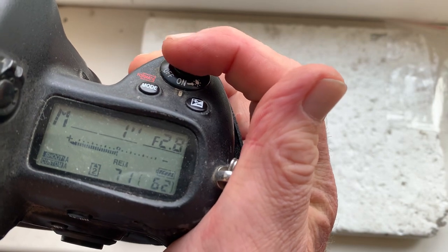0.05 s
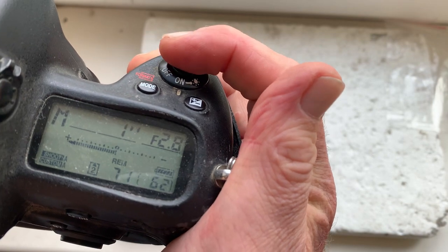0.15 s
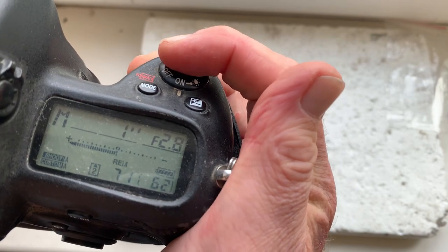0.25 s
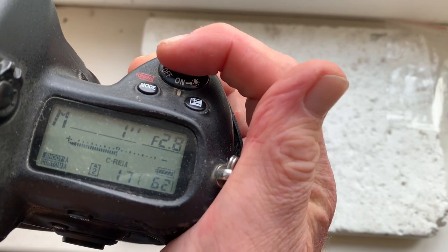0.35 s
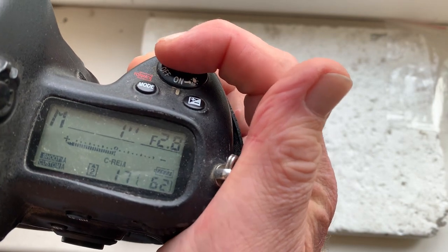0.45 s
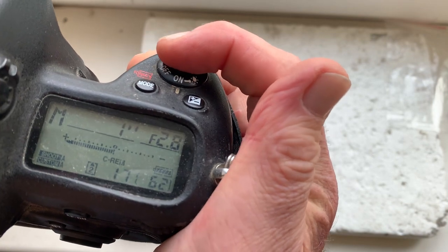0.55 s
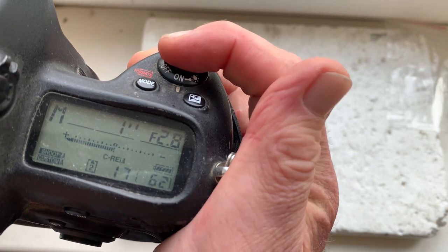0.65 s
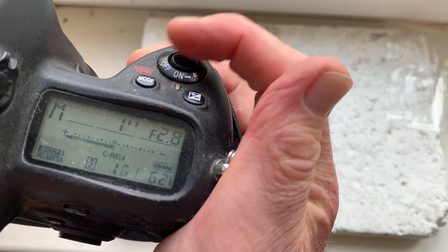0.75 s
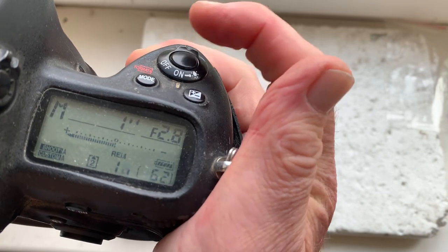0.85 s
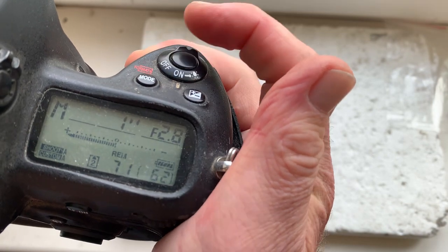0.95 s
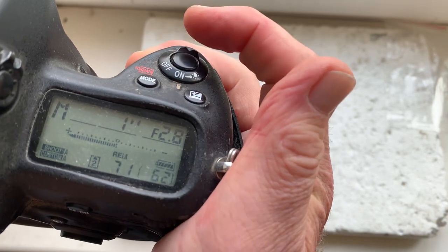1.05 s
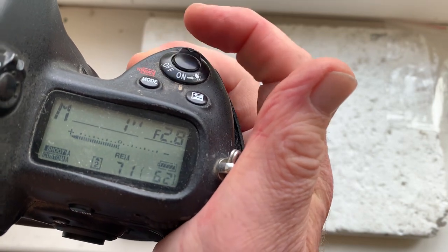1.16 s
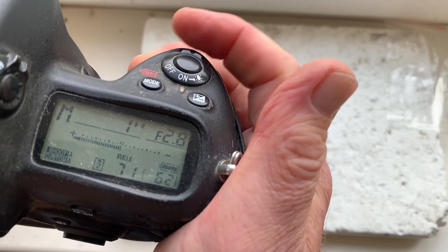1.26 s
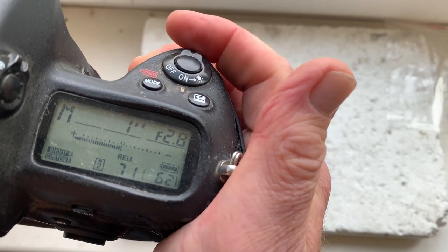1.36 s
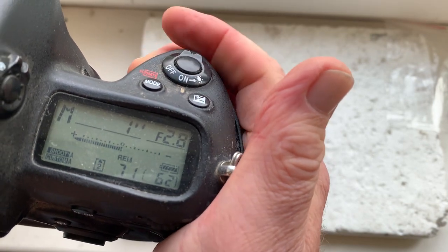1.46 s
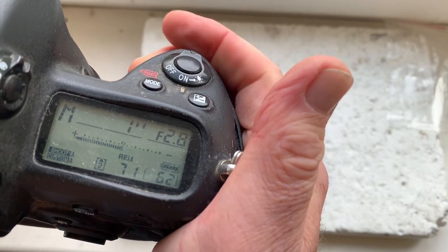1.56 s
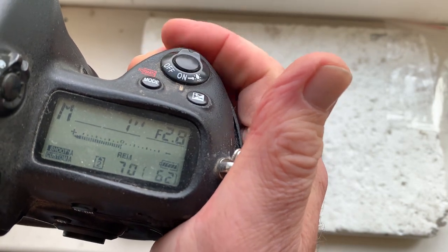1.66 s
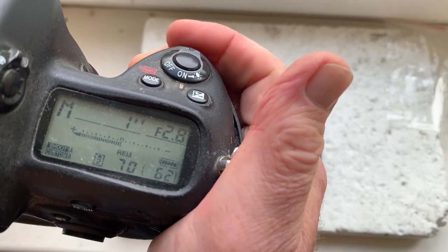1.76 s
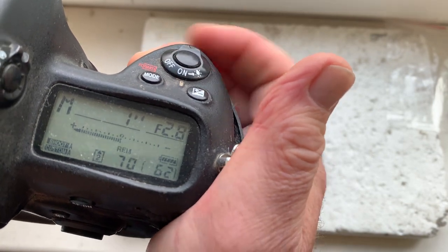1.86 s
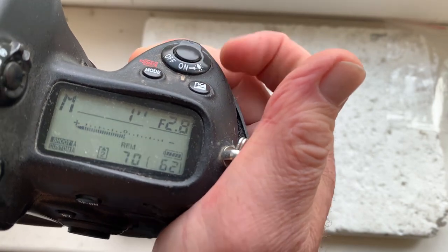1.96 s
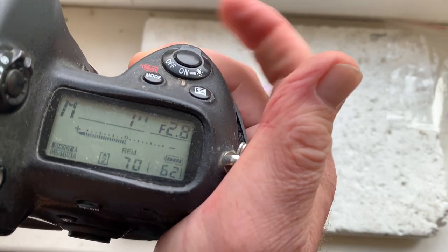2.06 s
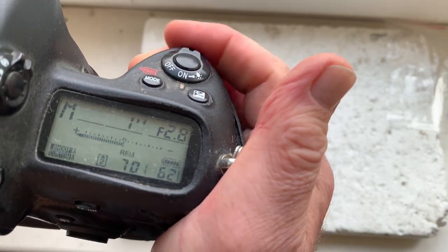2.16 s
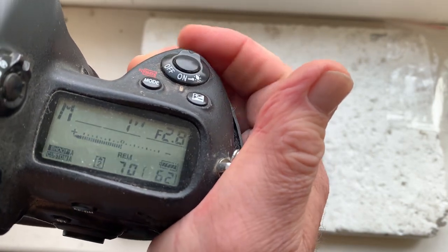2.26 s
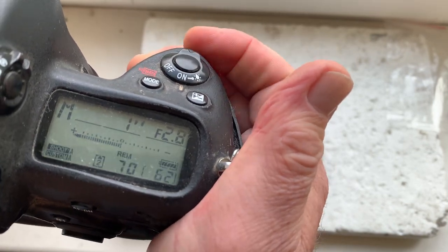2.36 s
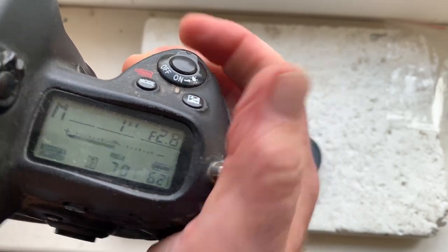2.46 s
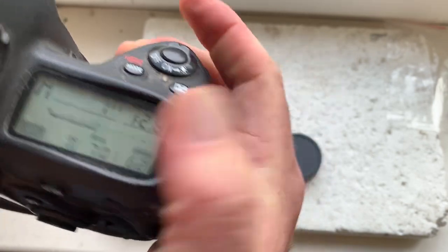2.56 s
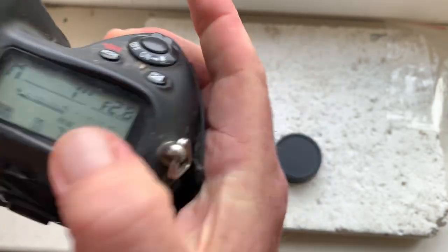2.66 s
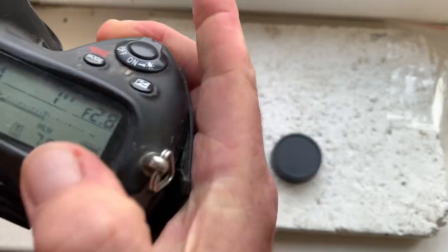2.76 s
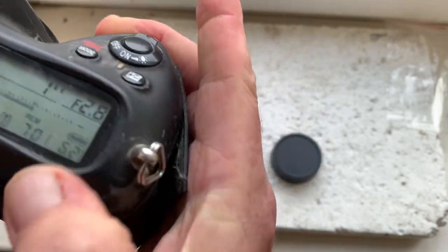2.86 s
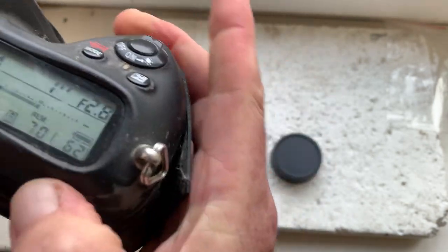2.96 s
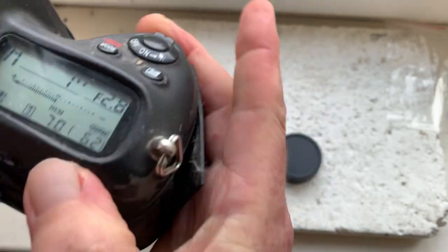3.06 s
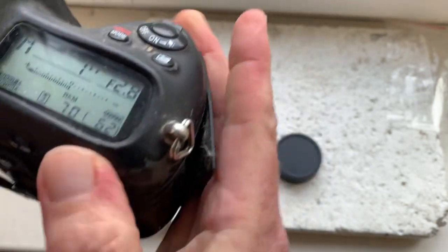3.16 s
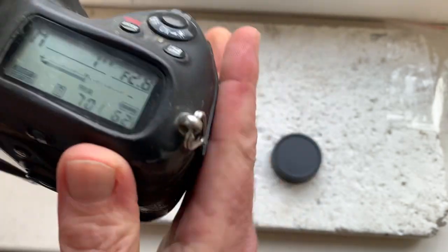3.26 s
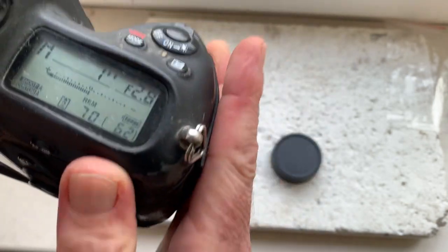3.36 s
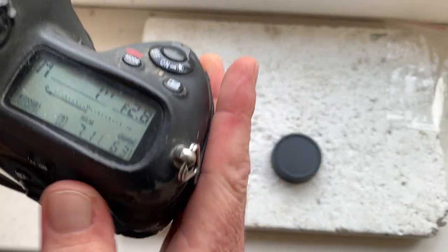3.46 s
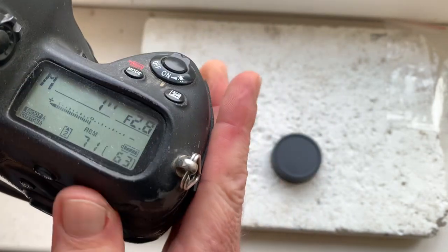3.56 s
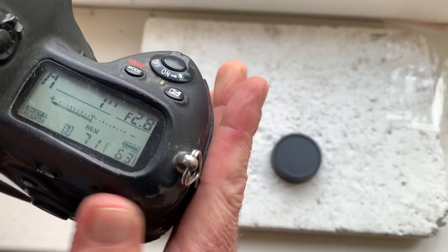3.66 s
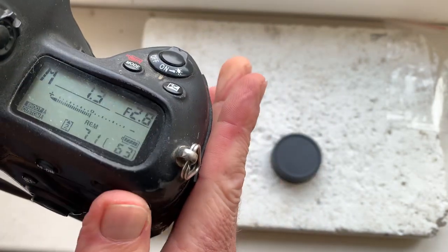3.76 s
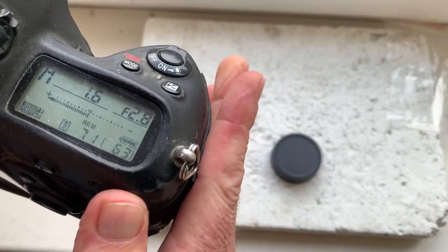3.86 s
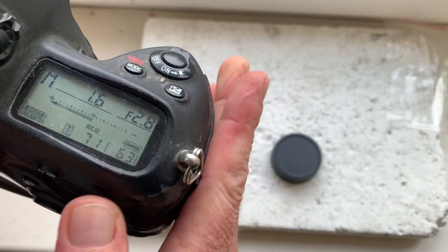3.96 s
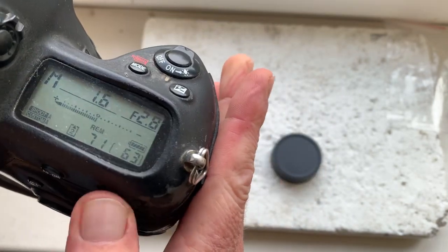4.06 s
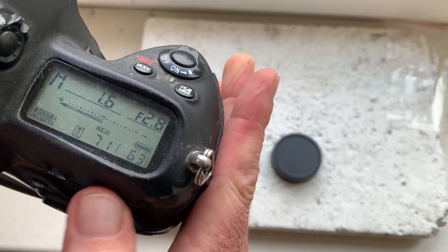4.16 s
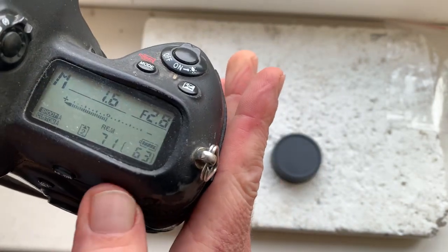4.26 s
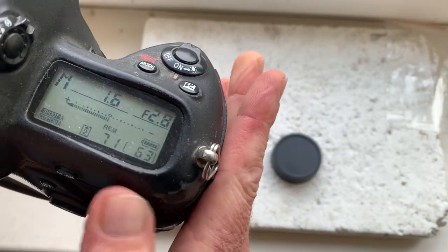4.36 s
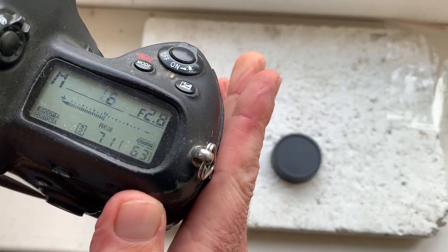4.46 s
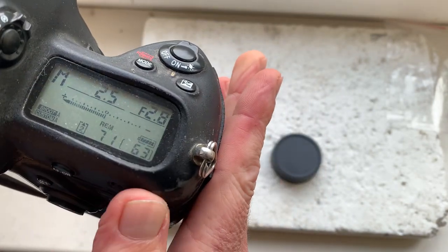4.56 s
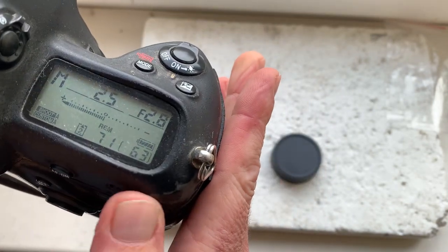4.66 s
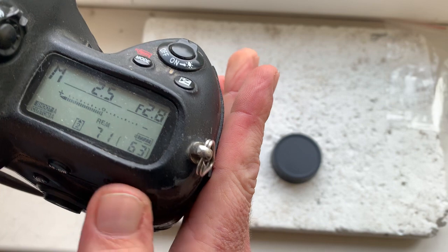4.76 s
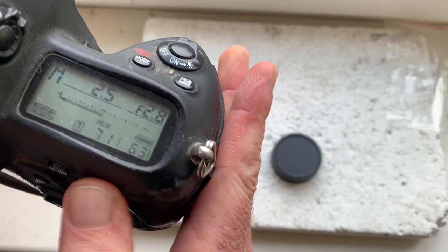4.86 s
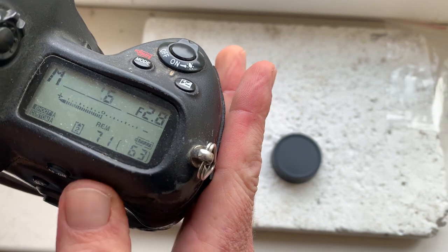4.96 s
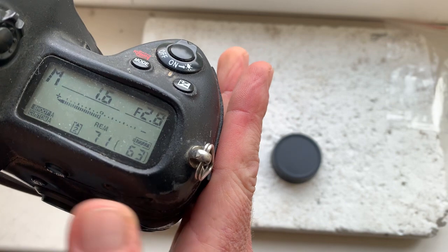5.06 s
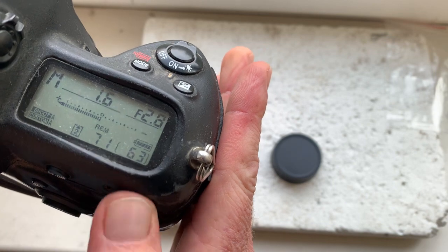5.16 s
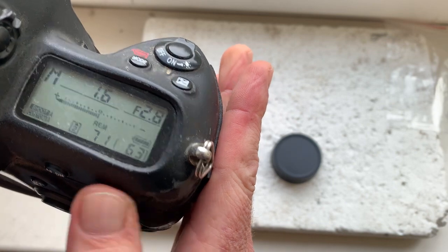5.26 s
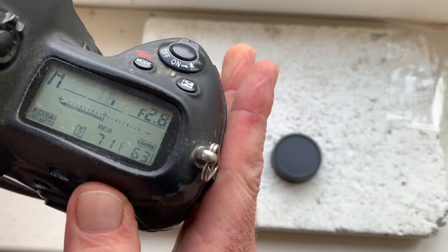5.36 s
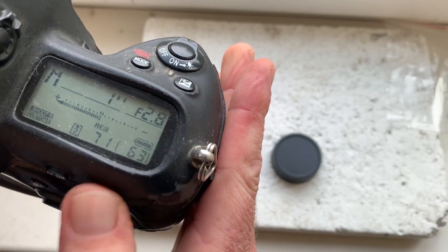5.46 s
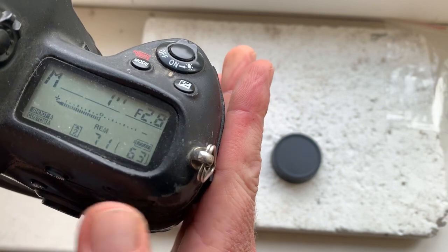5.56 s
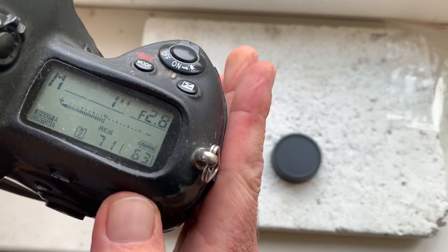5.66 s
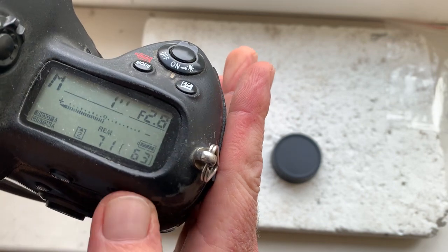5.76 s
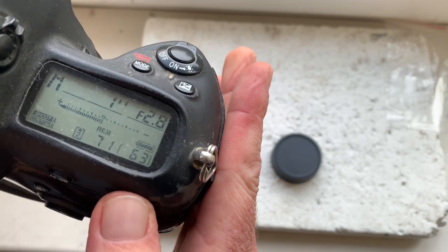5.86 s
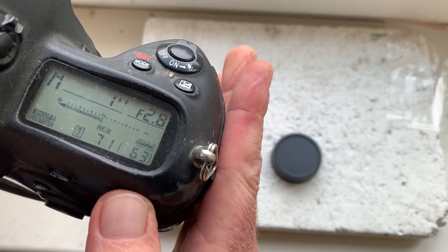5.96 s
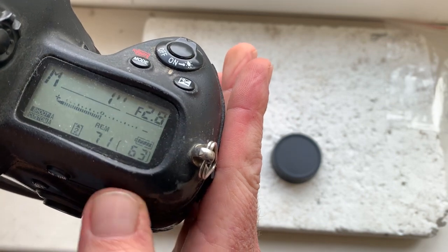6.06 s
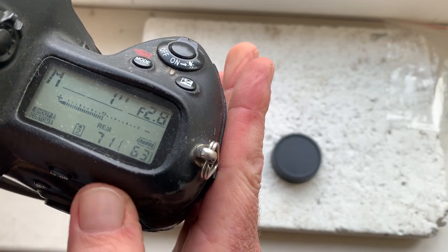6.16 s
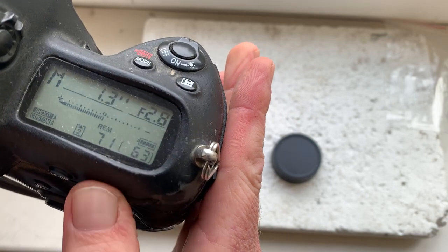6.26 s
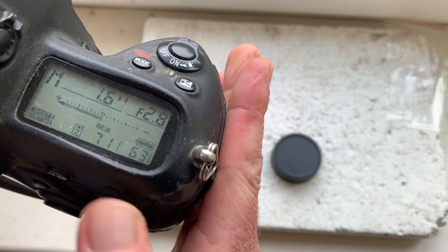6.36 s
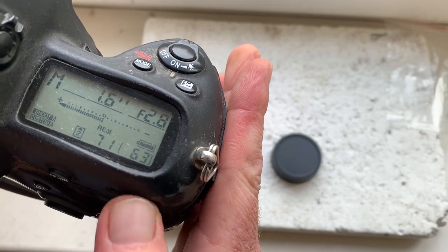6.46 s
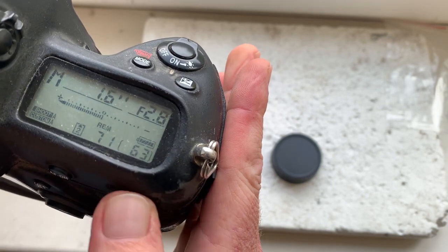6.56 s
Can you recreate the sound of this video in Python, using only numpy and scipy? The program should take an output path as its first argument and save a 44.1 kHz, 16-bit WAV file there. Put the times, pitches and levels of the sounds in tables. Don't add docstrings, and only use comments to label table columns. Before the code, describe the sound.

A quiet room holds a low, softly pulsing engine throb from beyond the walls, motor hum and faint hiss, heard by a close phone microphone. Barely audible skin ticks precede a loud, crisp metallic clatter at 0.43 s, a burst of hits lasting about 50 ms with a short shell ring. The rumble dips. A small tick sounds at 0.78, then at 1.47 a closing clatter, slightly longer and more rattling, with a brief thud and room echo; the rumble dips again. Light bright ticks come at 1.8-1.9 as skin lifts. At 2.43-2.75 fingers tap and slide on the grip, strongest near 2.55, with another rub and tick around 3.2 and a faint rubber creak. From 3.65 a thumb wheel clicks softly, with little buzzing slips near 3.9, 4.4, 4.7, 4.85, 5.27, 5.5, 6.1 and 6.55, all far quieter than the shutter.

```python
import sys
import numpy as np
from scipy import signal
from scipy.fft import rfft, irfft, next_fast_len
from scipy.io import wavfile
from scipy.ndimage import uniform_filter1d, map_coordinates

SR = 44100
rng = np.random.default_rng(int(sys.argv[2]) if len(sys.argv) > 2 else 0)


def voltage_ratio(level):
    return 10 ** (np.asarray(level, float) / 20)


def transcribe(signal):
    frames = np.atleast_2d(signal).T
    limited = np.clip(frames, -1, 1)
    pcm = np.round(limited * 32767).astype(np.int16)
    wavfile.write(sys.argv[1], SR, pcm)


N = 290971

METAL = {"body": [(940, 890, -10.5), (1490, 890, 3), (1900, 790, -3.5), (2360, 790, -4)],
         "middle": [(3500, 1400, -2.5), (4930, 4900, 0.5)], "treble": [(7790, 1200, -5), (9420, 1200, -0.5),
         (10800, 2000, 1), (12400, 1800, -1), (14600, 1500, 2), (15300, 1000, -4)]}
LEAN = {"metal": (1.0, 3, 0.9, -3, 3), "grip": (1.32, 3.5, 2, -5.5, 14.5), "detent": (1, -6, 0.84, 3, 5)}
STROKE_DB = 36


def unit(x):
    return x / np.sqrt(np.mean(x ** 2) + 1e-20)


def along(points, hz):
    f, v = np.transpose(points)
    return np.interp(np.log(hz + 1), np.log(f + 1), v)


def curves(rows):
    s, *cols = np.transpose(rows)
    return [np.interp(np.arange(N) / SR, s, c) for c in cols]


def wobble(rate):
    knots = rng.standard_normal(int(N * rate / SR) + 4)
    return map_coordinates(knots, [np.arange(N) * rate / SR])


def filtered(x, response):
    m = next_fast_len(N + SR // 2)
    return irfft(rfft(x, m) * response(np.fft.rfftfreq(m, 1 / SR)), m)[..., :N]


def pair(size, alike):
    a = rng.standard_normal((3, size))
    share = np.clip(alike, 0, 1)
    return np.sqrt(share) * a[0] + np.sqrt(1 - share) * a[1:]


def resonate(drive, part):
    out = 0
    for x, modes in zip(drive, (part["treble"], part["middle"], part["body"])):
        def response(f):
            bank = sum(voltage_ratio(db) * (1j * f * w / (c * c - f * f + 1j * f * w)) ** 2 for c, w, db in modes)
            return bank / np.sqrt(np.mean(abs(bank) ** 2))
        out = out + filtered(x, response)
    return out


def leaning(dull_db, lean, low=0):
    middle_slope, middle_db, body_slope, body_db, low_db = lean
    middle = middle_slope * dull_db + middle_db - low * low_db * .6
    body = body_slope * dull_db + body_db + low * low_db
    return voltage_ratio(np.array([0, middle, body]))


def contacts(table, part, lean, ring_db, alike, crack):
    drive, ring, t = np.zeros((3, 2, N + SR)), np.zeros(N + SR), np.arange(SR // 10) / SR
    for s, db, dull_db, t60_ms, hz in table:
        shape = voltage_ratio(-6e4 * t / max(t60_ms, 2)) * (1 - np.exp(-t / 0.000073))
        burst = shape * pair(len(t), alike)
        burst[:, 0] = crack * np.linalg.norm(shape)
        burst *= voltage_ratio(db) * np.linalg.norm(shape) / np.linalg.norm(burst, axis=1, keepdims=True)
        band = int(hz < 6500) + int(hz < 2780)
        gains = leaning(dull_db, lean, band == 2)
        k = round(s * SR)
        drive[:, :, k:k + len(t)] += gains[:, None, None] * burst
        ring[k:k + len(t)] += gains[band] * voltage_ratio(db + ring_db) * shape * np.sin(2 * np.pi * hz * t)
    return resonate(drive[..., :N], part) + ring[:N]


def rubs(strokes, part, lean, grain_db):
    drive, t = np.zeros((3, N)), np.arange(N) / SR
    for s, rise, fall, db, dull_db in strokes:
        away = np.where(t < s, (s - t) / rise, (t - s) / fall)
        drive += leaning(dull_db, lean)[:, None] * voltage_ratio(db - STROKE_DB * away)
    grain = unit(voltage_ratio(grain_db * (wobble(500) + 0.38 * wobble(90))))
    return resonate(drive[:, None] * grain * pair(N, 0.35), part)


def ducking():
    # (t/s, hold/s, first depth/dB, last depth/dB)
    loud_moments = [
        (0.459, 0.363, 3.7, 11.2),
        (1.49, 0.548, 16, 8.1),
    ]
    duck_s, return_s = 0.063, 0.05
    total_db = 0
    for s, hold, first_db, last_db in loud_moments:
        steps = [(s, 0), (s + duck_s, -first_db), (s + hold, -last_db), (s + hold + return_s, 0)]
        total_db = total_db + curves(steps)[0]
    return total_db


def background():
    # (t/s, level/dB)
    effort = [(0, -64.5), (.9, -66), (1.48, -61), (2.1, -65.5), (2.6, -61), (3.4, -66), (4.0, -59.5),
              (4.6, -64), (6.6, -64)]
    # (multiple of the cycle rate, level/dB)
    engine_orders = [(6, -12.5), (7, -22), (8, -6), (12, -19.5), (13, -20), (14, 0.5), (15, -14.5),
                     (16, -12.5), (18, -20), (19, -19), (21, -16.5), (24, -21), (27, -19), (28, -21),
                     (29, -19), (32, -17)]
    # (f/Hz, level/dB)
    hums = [(49.1, -17.5), (119.9, -15.5)]
    # (f/Hz, level per Hz/dB)
    rumble_colour = [(25, -30), (40, 0.5), (80, 6), (170, -5), (300, -21), (385, -9), (480, -18),
                     (700, -29), (1200, -55.5)]
    hiss_colour = [(150, -19.5), (280, 10), (600, 4), (1000, 3), (1800, 3), (3000, -3), (5000, -3),
                   (7500, -5.5), (10300, -4.5), (11200, 0.5), (11700, -7.5), (13000, -3.5), (13900, -15.5),
                   (14900, 2), (15600, -25)]
    cycle_hz = 5.348
    t = np.arange(N) / SR
    turn = 2 * np.pi * cycle_hz * (t - .044)
    engine = sum(voltage_ratio(db + wobble(11)) * np.cos(k * turn + 0.11 * wobble(0.86)) for k, db in engine_orders)
    motors = sum(voltage_ratio(db) * np.sin(2 * np.pi * hz * t) for hz, db in hums)
    rumble = unit(filtered(pair(N, 0.78), lambda hz: voltage_ratio(along(rumble_colour, hz))))
    hiss = unit(filtered(pair(N, .1), lambda hz: voltage_ratio(along(hiss_colour, hz))))
    room = voltage_ratio(curves(effort)[0] + ducking()) * (engine + motors + voltage_ratio(-4.0) * rumble)
    drift_db = .4 * wobble(6)
    return room + voltage_ratio(-80 + drift_db) * hiss


def hands():
    # (t/s, treble peak level/dB, dullness/dB, t60/ms, ring f/Hz)
    button_ticks = [(0.2374, -66, -3, 12, 2900), (0.334, -84.5, 10.5, 15, 2900), (0.7696, -67, 5, 20, 4220),
                    (0.7768, -39, -6.5, 5.2, 9100), (1.818, -42.5, -7.5, 4, 10800),
                    (1.8075, -65, -10, 15, 11000), (1.8254, -64, -11, 8, 11000),
                    (1.8338, -52, -4, 11, 9420), (1.8647, -54, -7, 6, 10500), (1.8705, -57, 2, 23, 11500),
                    (1.8755, -57, 4, 8.2, 10300), (1.8813, -55, 0, 17, 11540),
                    (1.8848, -50.5, -1.5, 21, 10200), (2.1146, -68.5, 3.5, 10.5, 4320),
                    (2.2608, -73, -7, 14, 10500), (2.2705, -65.5, -13.5, 14, 11000),
                    (2.279, -73, -16, 12, 10500), (.152, -77, -8, 12.5, 10800),
                    (2.2893, -79.5, 5.5, 15, 2700)]
    finger_ticks = [(2.4329, -35, -8.5, 7.4, 8600), (2.438, -50.5, 1.5, 18, 5000),
                    (2.4705, -62, 2, 10, 4500), (2.466, -62, -14, 8, 12100), (2.477, -60, -14, 8, 13000),
                    (2.4827, -44, 0.5, 8.6, 3300), (2.4862, -43.5, 0.5, 12, 7100),
                    (2.538, -30, -2, 2.6, 9200), (2.5619, -28, -8, 2.6, 7000), (2.5708, -33, -6, 9.5, 8350),
                    (2.5753, -50, 3, 16, 8000), (2.6156, -70, 9, 25, 9000), (2.6798, -61.5, 0.5, 8.8, 4470),
                    (2.7072, -54, -2, 8.6, 6310), (2.7347, -64, -1.5, 11.7, 5740),
                    (3.0329, -69.5, -4.5, 30, 2044), (3.172, -37, -8, 23, 7960),
                    (3.1934, -53, -5, 7.3, 8900), (3.4034, -61, 1.5, 14.8, 1900)]
    thumb_ticks = [
        (3.921, -73, 6, 17, 1900),
        (3.9213, -54.5, -9, 13.6, 11000),
        (4.6728, -53, -5, 10, 1900),
        (5.4745, -65, -4.5, 15, 2714),
        (5.4785, -57.5, 0, 12, 7000),
        (6.5522, -64.5, -2.5, 10.5, 4550),
        (6.5605, -71.5, 3, 14, 4240),
    ]
    # (peak
    # t/s, rise/s, fall/s, treble level/dB, dullness/dB)
    skin_slides = [(.4345, 0.021, .002, -59, 12), (.774, 0.048, .03, -62, -9),
                   (1.4705, .025, .002, -60, 7.5), (1.83, .04, 0.03, -64.5, -11),
                   (1.874, .025, 0.047, -57.5, -9.5), (2.28, 0.14, 0.13, -80, -3),
                   (2.44, 0.063, 0.095, -71, -5), (2.5, 0.1, 0.032, -64.5, 3.5),
                   (2.58, 0.13, 0.086, -76, 9.5), (2.72, 0.19, 0.14, -79, 0), (2.95, 0.51, .3, -80, -3),
                   (3.115, 0.13, 0.22, -62.5, -3), (3.2, 0.11, 0.1, -55, -3), (6.555, .025, 0.025, -77, 2)]
    creak_strokes = [
        (3.045, .04, .5, -94, 22),
        (3.2, 0.13, .07, -96.5, 24),
    ]
    grip_part = {"body": [(1000, 700, -10.5), (1887, 780, 0.5), (2700, 380, -2)],
                 "middle": [(3300, 1200, -3), (5180, 2900, 1.5)], "treble": [(6930, 2300, -1),
                 (10000, 2900, 0.5), (14953, 900, -11.5)]}
    creak_part = {"body": [(2000, 190, 0)], "middle": [(4000, 750, 0)], "treble": [(8600, 4000, 0)]}
    ticks = contacts(button_ticks + finger_ticks + thumb_ticks, grip_part, LEAN["grip"],
                     ring_db=0.0, alike=0.27, crack=0.47)
    slides = rubs(skin_slides, grip_part, LEAN["grip"], grain_db=1.5)
    long_creak = rubs(creak_strokes[:1], creak_part, (1.5, -22, 1, 0, 0), grain_db=5.0)
    short_creak = rubs(creak_strokes[1:], creak_part, (1.5, 3.5, 2.0, -20, 0), grain_db=7)
    return ticks + slides + long_creak + short_creak


def opening_clatter():
    # (t/s, treble peak level/dB, dullness/dB, t60/ms, ring f/Hz)
    opening_hits = [(.4349, -22.5, -7, 5.7, 10400), (.4355, -7, -9, 5.3, 11020),
                    (.4363, -14.5, -3, 5.4, 6277), (.4371, -7, -9, 6.5, 11000), (.4378, -11, -6, 6, 10600),
                    (.4385, -31.5, 6.5, 6.9, 1410), (.4393, -25, 0, 9.9, 7200),
                    (.4412, -23, -1.5, 16, 10800), (.4444, -27.5, -2, 12, 9400),
                    (.4478, -21, -9.5, 8, 10800), (.4487, -23, -10, 6, 12500), (.4494, -19, -9, 8.2, 11000),
                    (.4516, -30, -4, 18, 10700), (.4563, -28, -7.5, 14, 10500),
                    (.4605, -35.5, -3, 20, 3700), (.4652, -37.5, -2.5, 25, 10450),
                    (.4712, -28.5, -4, 16, 1410), (.4742, -27.5, 0, 12, 4970),
                    (.4758, -18.5, -7.5, 8, 10600), (.4768, -14.5, -7.5, 8, 11100),
                    (.4782, -18, -6.5, 12, 9850), (.48, -28, -1, 18, 5530), (.4847, -33.5, -4, 30, 9200)]
    return contacts(opening_hits, METAL, LEAN["metal"], ring_db=-1.5, alike=0.62, crack=0.6)


def thuds():
    # (t/s, level/dB, f/Hz, t60/s)
    shell_jolts = [(.4358, -26.5, 2256, 0.045), (.4355, -28, 670, 0.011), (.436, -37, 940, 0.015),
                   (0.435, -42.5, 474, 0.014), (.474, -41.5, 1042, .04), (.478, -39.5, 1400, .12),
                   (1.4723, -24, 1650, .04), (.4352, -20.5, 3760, .02), (.475, -35.5, 4080, .035),
                   (.476, -31, 4970, .04), (1.4755, -24.5, 4090, .03), (1.4755, -28, 6280, .03),
                   (1.494, -36, 1480, .05), (1.473, -33, 380.8, 0.079), (1.474, -39.5, 784, .04),
                   (1.494, -37, 1000, 0.043), (1.5, -41.5, 369, 0.097), (1.519, -36, 852, 0.063)]
    spring_pings = [
        (5.618, -66, 2000, .025),
        (6.315, -60, 1850, .025),
        (4.672, -57.5, 1900, .02),
    ]
    out, t = np.zeros(N + SR), np.arange(SR // 5) / SR
    for s, db, hz, t60 in shell_jolts + spring_pings:
        shape = voltage_ratio(db - 60 * t / t60) * (1 - np.exp(-t / 0.00096))
        out[round(s * SR):][:len(t)] += shape * np.sin(2 * np.pi * hz * t)
    return out[:N]


def closing_clatter():
    # (t/s, treble peak level/dB, dullness/dB, t60/ms, ring f/Hz)
    closing_hits = [(1.4706, -28.5, -8, 14, 3390), (1.4716, -22, 0.5, 14, 10500),
                    (1.4734, -24.5, 1.5, 14, 4100), (1.4756, -9, -2.5, 6, 7520),
                    (1.4763, -16.5, -4, 8, 6300), (1.4775, -19, -1.5, 12, 12500),
                    (1.4795, -26, 1, 18, 3380), (1.4825, -27, 2.5, 20, 4140), (1.4862, -28, 1, 22, 10370),
                    (1.4901, -24.5, -2, 18, 9500), (1.4936, -16, -9, 8, 10000),
                    (1.4946, -15.5, -7.5, 10, 10800), (1.4978, -13, -6.5, 8, 10400),
                    (1.5003, -19, -5.5, 10, 9520), (1.5012, -16.5, -6.5, 7, 12000),
                    (1.5022, -15.5, -5.5, 10, 10800), (1.5038, -19.5, -5, 10, 3570),
                    (1.506, -22, -2.5, 14, 4430), (1.5085, -24.5, -5.5, 14, 10400),
                    (1.5109, -15, -12, 6, 9520), (1.514, -23, -6, 16, 10300),
                    (1.5158, -23.5, -6.5, 12, 12290), (1.5179, -9.5, -12, 5, 12300),
                    (1.5192, -16.5, -10.5, 9, 10800), (1.5208, -20.5, -7.5, 12, 6680),
                    (1.5222, -21, -5.5, 12, 10000), (1.5258, -27.5, -5.5, 22, 10800)]
    return contacts(closing_hits, METAL, LEAN["metal"], ring_db=-6, alike=0.26, crack=0.5)


def chatter():
    # (peak t/s, rise/s, fall/s, level/dB, f/Hz)
    buzzes = [(2.261, .04, 0.053, -67, 3900), (2.292, .015, .03, -74, 2900), (3.92, .05, .09, -67.5, 2900),
              (3.92, .05, .07, -64.5, 1900), (4.37, .015, .05, -62.5, 4000), (4.385, .03, .05, -64, 1900),
              (4.445, .07, .03, -73, 3890), (4.685, .05, .07, -73, 2900), (4.84, .03, .05, -67, 4000),
              (4.87, .05, .05, -67, 4000), (4.845, .04, .05, -64, 1900), (4.873, .03, .08, -62, 2100),
              (5.258, .04, .06, -67, 3900), (5.29, .04, .04, -68.5, 3950), (5.262, .03, 0.049, -73, 2700),
              (5.295, 0.043, .07, -65, 2200), (5.485, .05, .1, -71.5, 2192), (6.098, .04, .03, -71, 4000),
              (6.1, .03, .04, -67.5, 2000), (6.115, .02, .06, -65.5, 2200), (6.19, .25, .08, -76.5, 7000),
              (6.556, .03, .06, -66, 4635)]
    sharpness = 4.4
    half = SR // 5
    out, t = np.zeros((2, N + SR)), np.arange(-half, half) / SR
    grain = np.tile(wobble(300), 2)
    for s, rise, fall, db, hz in buzzes:
        span = int(SR * sharpness / hz)
        start = round(s * SR) - half
        a, b = (uniform_filter1d(uniform_filter1d(pair(len(t), 0.44), span), span) for _ in "ab")
        catching = voltage_ratio(3.5 * grain[start:][:len(t)])
        buzz = unit(catching * a * np.cos(2 * np.pi * hz * t) + b * np.sin(2 * np.pi * hz * t))
        away = np.where(t < 0, -t / rise, t / fall)
        out[:, start:][:, :len(t)] += voltage_ratio(db - STROKE_DB * away) * buzz
    return out[:, :N]


def thumb_wheel():
    # (t/s, treble peak level/dB, dullness/dB, t60/ms, ring f/Hz)
    notch_clicks = [(3.6135, -76.5, 7, 10, 2570), (3.6471, -65, 11, 20, 4000), (3.6565, -50, -15, 8, 7100),
                    (3.6773, -62, 1, 19.6, 2194), (3.6849, -46, -17, 3.7, 7100),
                    (3.6876, -57.5, -5, 20, 2165), (4.3665, -74, -16, 15, 11200),
                    (4.3801, -64, 3, 13, 11200), (4.4457, -70, -4, 23.7, 1796),
                    (4.8725, -54, -16, 23, 2100), (5.2641, -79.5, 10, 15, 900),
                    (5.2939, -74.5, 17.5, 9.2, 1900), (6.1031, -69.5, -3, 14, 11000),
                    (6.1126, -68.5, 1, 12, 7100)]
    # (peak t/s, rise/s, fall/s, treble level/dB, dullness/dB)
    wheel_turns = [
        (3.656, 0.049, 0.084, -60, 1),
        (4.375, 0.049, 0.058, -72, -7),
        (4.445, .1, .04, -79.5, -1),
        (4.842, 0.054, .06, -67, -3.5),
        (4.87, 0.027, 0.036, -64, 3),
        (5.265, 0.049, 0.096, -69, 4.5),
        (6.1, .3, 0.15, -86.5, -8),
        (6.17, .25, .15, -83, -12),
    ]
    wheel_part = {"body": [(833, 215, -8.5), (1497.5, 140, -12.5), (2100, 1360, 0)],
                  "middle": [(2900, 840, -19), (4000, 187, 30), (5544, 4330, 4)],
                  "treble": [(7100, 2200, -1.5), (9600, 2590, -1), (11000, 1510, -5.5), (12500, 2000, -4)]}
    clicks = contacts(notch_clicks, wheel_part, LEAN["detent"], ring_db=5.5, alike=0.06, crack=0.2)
    turning = rubs(wheel_turns, wheel_part, LEAN["detent"], grain_db=4.0)
    return clicks + turning + voltage_ratio(-4.5) * chatter()


def walls(x):
    # (f/Hz, t60/s)
    wall_decay = [(300, .33), (800, .24), (2000, .21), (5500, .185), (10000, .165), (14000, .15)]
    hz, t, z = signal.stft(rng.standard_normal((2, SR // 2)), SR, nperseg=256)
    fade = voltage_ratio(-60 * t / along(wall_decay, hz)[:, None])
    tail = signal.istft(z * fade, SR, nperseg=256)[1]
    late = np.pad(x, ((0, 0), (260, 0)))
    return signal.fftconvolve(late, tail / np.linalg.norm(tail[0]), axes=1)[:, :N]


def scene():
    room = background()
    handling = hands()
    opening = opening_clatter()
    closing = closing_clatter() + thuds()
    wheel = thumb_wheel()
    wet = voltage_ratio(-15) * walls(opening) + voltage_ratio(-18.5) * walls(closing) + voltage_ratio(-20.0) * walls(handling + wheel)
    return opening + closing + handling + wheel + wet + room


def low_pass(x):
    return signal.sosfilt(signal.butter(12, 17070, fs=SR, output="sos"), x)


def record(dry):
    # (f/Hz, f/Hz, f/Hz)
    split_hz = (450, 6600, 14400)
    port_lag = (-13, 8)
    # (f/Hz, level/dB)
    treble_top = [(13000, 1), (13600, -13.5), (14500, -19.5), (15600, -8), (15900, -15), (16500, -39.5),
                  (17200, -90.5)]
    low_hz, high_hz, top_hz = split_hz

    def above(f, corner, steepness):
        return 1 - 1 / (1 + (f / corner) ** steepness)

    def bass(f):
        return 0.32 * (1 - above(f, low_hz, 7.5))

    def treble(f):
        return .85 * above(f, high_hz, 20)

    def trail(f):
        middle_lag = port_lag[0] * (1 - 0.88 * bass(f)) * (1 - above(f, high_hz, 20))
        treble_lag = port_lag[1] * above(f, high_hz, 22) * (1 - above(f, top_hz, 90))
        return middle_lag + treble_lag

    def port(f):
        shift = np.exp(1j * np.pi * np.array([[-1], [1]]) * trail(f) * f / SR)
        return shift * voltage_ratio(along(treble_top, f))

    copied = filtered(dry[0], lambda f: bass(f) + treble(f))
    own = filtered(dry[1], lambda f: (1 - bass(f)) * (1 - treble(f)))
    mix = filtered(np.array([dry[0], copied + own]), port)
    return low_pass(mix)


dry = scene()
out = record(dry)
transcribe(out)
```